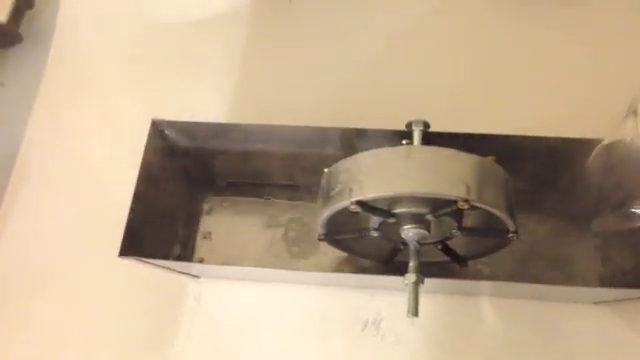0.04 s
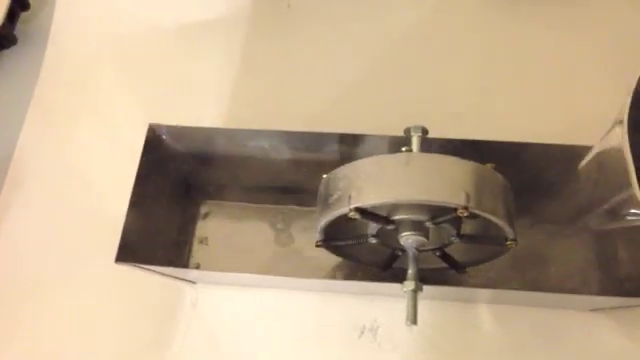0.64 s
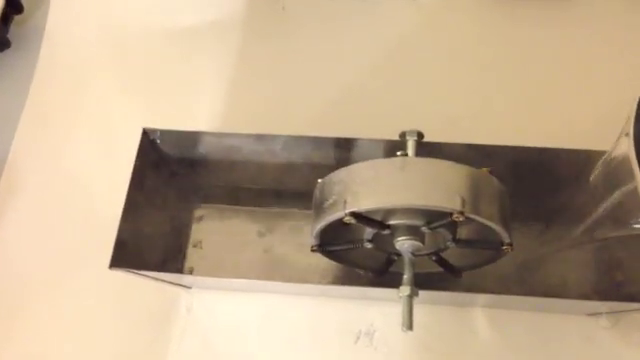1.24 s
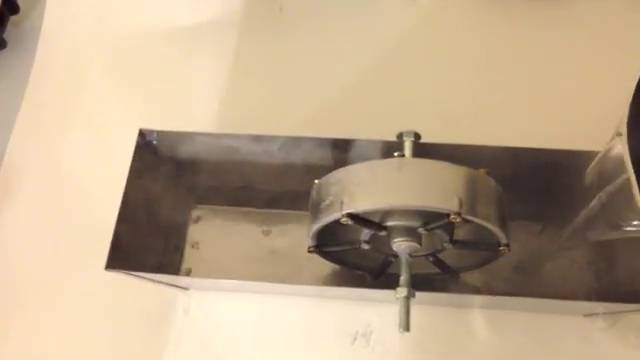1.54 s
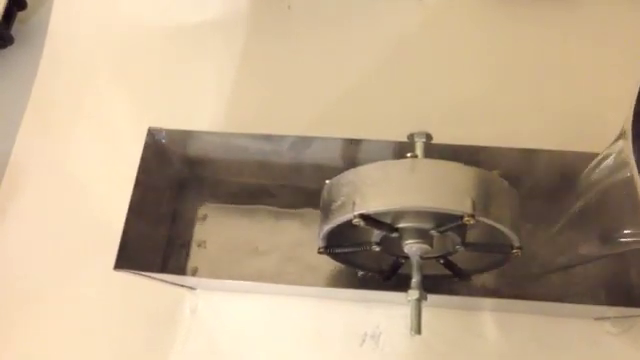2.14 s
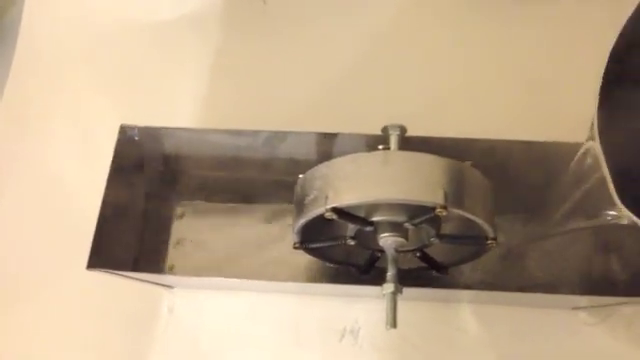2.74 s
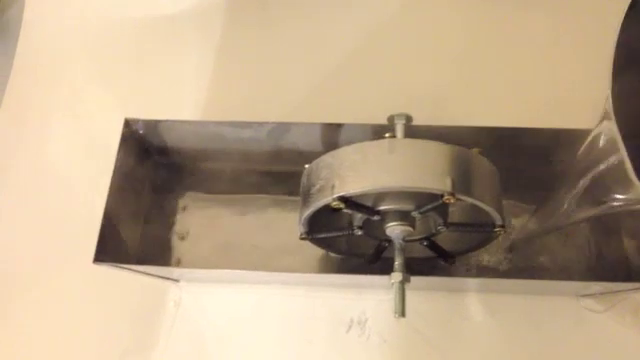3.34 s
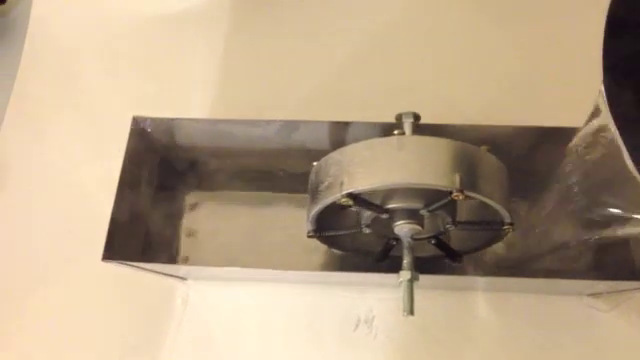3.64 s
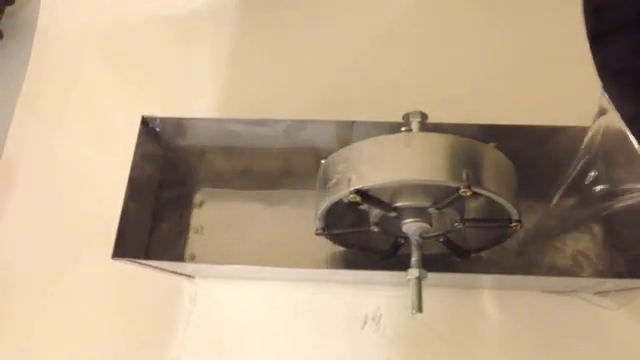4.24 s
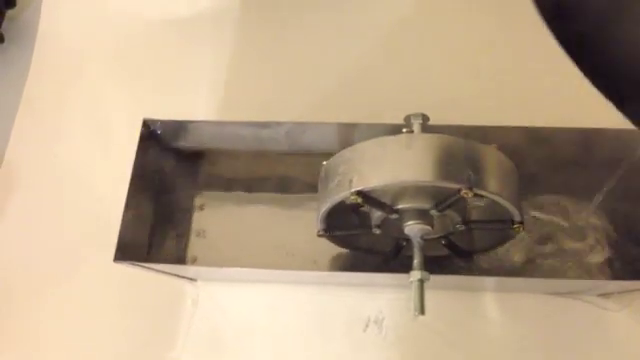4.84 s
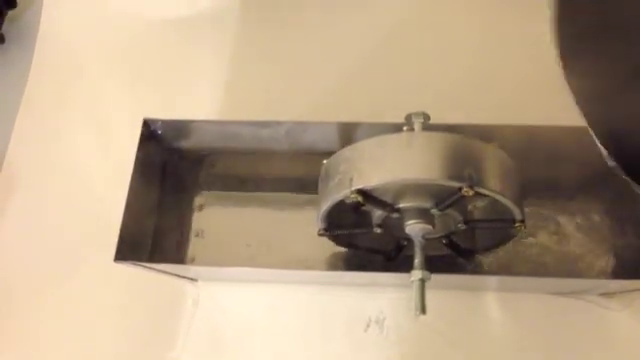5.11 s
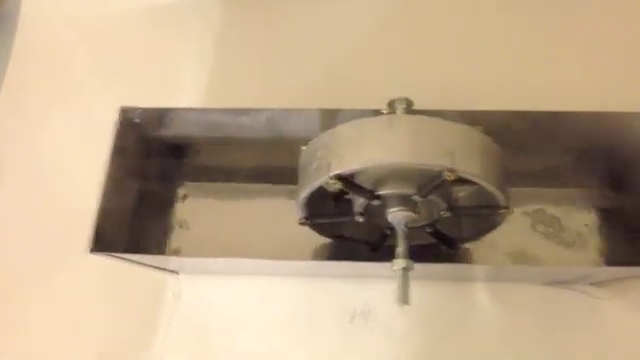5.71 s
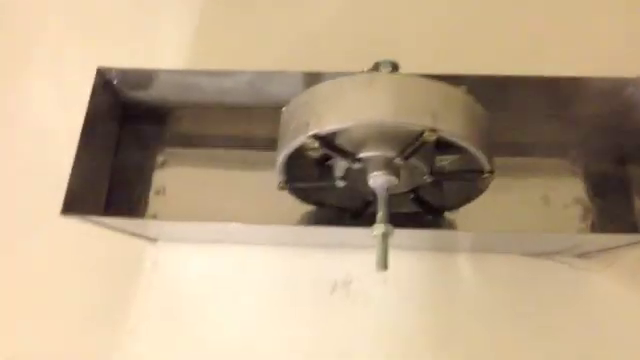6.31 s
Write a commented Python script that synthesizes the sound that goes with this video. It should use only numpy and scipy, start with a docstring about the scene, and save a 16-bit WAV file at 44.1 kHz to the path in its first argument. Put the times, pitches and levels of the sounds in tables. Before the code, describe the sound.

Water pours from a cup into a narrow steel basin, splashing and fizzing, thins to pinging drips, then one hard metallic knock.

```python
"""Water pours from a cup onto a small wheel and splashes into a narrow steel basin, close by.
The stream patters, fizzes and spits, trapped bubbles ring, and heavy gulps slap the thin floor.
As the pour thins out, the last drips make the steel ping. Then one hard knock rings the basin
and ducks the gain. The room hums faintly underneath."""
import sys
import numpy as np
from scipy import signal
from scipy.fft import rfft, irfft, next_fast_len
from scipy.io import wavfile
from scipy.ndimage import uniform_filter1d, minimum_filter1d, map_coordinates

SR = 44100
rng = np.random.default_rng(int(sys.argv[2]) if len(sys.argv) > 2 else 0)


def to_wav(sig):
    """Store sig (one row per channel, or 1-D mono) as 16-bit WAV at the path in sys.argv[1].

    Samples outside -1..1 are clipped; the rate is SR.
    """
    pcm = np.clip(np.atleast_2d(sig), -1, 1) * 32767
    pcm = np.round(pcm).astype(np.int16)
    wavfile.write(sys.argv[1], SR, pcm.T)  # frames by channels


N = 285327
TIME = np.arange(N) / SR
AGE = TIME[:SR // 3]  # seconds into a one-shot
THIN_S, DRAINED_S, STOP_S = 4.1, 4.9, 5  # the stream starts to thin, has run off the floor, stops

# bright resonances of the basin's floor: f/Hz, width/Hz, level/dB
FLOOR_MODES = [(778.5, 41, 3.5), (855, 49, -4.5), (1450, 48, -10.5)]


def amp(db):
    """Decibels to gain."""
    return 10 ** (np.asarray(db) / 20)


def unit(x):
    """Scale to rms 1."""
    return x / np.sqrt(np.mean(x ** 2) + 1e-20)


def fade(t60, t=AGE):
    """An exponential decay, 60 dB down after t60 seconds."""
    return np.exp(-np.log(1000) * t / t60)


def add(track, s, sound):
    """Mix a sound into a track at time s."""
    part = track[max(round(s * SR), 0):][:len(sound)]
    part += sound[:len(part)]


def filtered(x, response):
    """Pass x through a frequency response."""
    size = next_fast_len(len(x) + 8192)
    return irfft(rfft(x, size) * response(np.fft.rfftfreq(size, 1 / SR)), size)[:len(x)]


def shape(points):
    """An EQ curve through (f/Hz, level/dB) points on a log axis."""
    f, db = np.transpose(points)
    return lambda hz: amp(np.interp(np.log(hz + 1), np.log(f), db))


def resonances(modes):
    """A bank of (f/Hz, width/Hz, level/dB) resonators of alternating polarity."""
    return lambda f: sum((-1) ** k * amp(db) * 1j * f * width / (hz * hz - f * f + 1j * f * width)
                         for k, (hz, width, db) in enumerate(modes))


def hump(centre_hz, octaves):
    """A bell-shaped band around a centre."""
    return lambda hz: np.exp(-.5 * (np.log2((hz + 1) / centre_hz) / octaves) ** 2)


def noise(response, size=len(AGE)):
    """Coloured noise of rms 1."""
    return unit(filtered(rng.standard_normal(size), response))


def ring(hz, t60):
    """One decaying mode."""
    return np.sin(2 * np.pi * hz * AGE) * fade(t60)


def struck(modes):
    """(f/Hz, level/dB, t60/s) modes set ringing together in alternating polarity."""
    return sum((-1) ** k * amp(db) * ring(hz, t60) for k, (hz, db, t60) in enumerate(modes))


def wobble(rate):
    """A smooth random curve, rate knots a second."""
    return map_coordinates(rng.standard_normal(int(N * rate / SR) + 4), [TIME * rate])


def patter(rate, spread_db, t60, wash):
    """Random impacts of uneven size, each a tiny burst, over a wash of countless smaller ones."""
    hits = (rng.random(N) < rate / SR) * amp(spread_db * np.minimum(rng.standard_normal(N), 2))
    power = np.abs(signal.fftconvolve(hits ** 2, fade(t60) ** 2)[:N])
    return unit(np.sqrt(power / power.mean() + wash ** 2) * rng.standard_normal(N))


def flow_db(s=TIME, even_pour_db=-59.5):
    """Strength of the stream against an even pour."""
    # the pour as the cup tips: t/s, level/dB
    pour = [(0.0, -53.5), (0.42, -58.5), (1.48, -59.5), (2.32, -56.5), (2.83, -62.5), (3.4, -63.5),
            (3.68, -57.5), (3.91, -60.5), (4.25, -62), (4.4, -64), (4.75, -67.5), (4.89, -69), (5.0, -88)]
    return np.interp(s, *np.transpose(pour)) - even_pour_db


def fullness():
    """1 for a full stream, falling to 0 as it thins to a thread."""
    return np.interp(TIME, [THIN_S, STOP_S], [1, 0])


def cover_db(s=TIME, db_per_s=3.5):
    """Water mutes the floor's bright notes: it gathers under a full stream and runs off as it thins."""
    return -db_per_s * s * np.interp(s, [THIN_S, DRAINED_S], [1, 0])


def stream():
    """Lumps of water drum on the floor, splash on the walls, fizz and throw spray, riding the flow."""
    # the wet basin's low, wall and high resonances: f/Hz, width/Hz, level/dB
    low_modes = [(138.4, 19, 1), (232, 29, -22), (333, 58, -1), (431, 35, 0.5), (510, 83, -6),
                 (656, 82, -1)]
    wall_modes = [(1070, 84, -1.5), (1232, 70, 0), (1395, 45, 1), (1710, 126, -2.5), (1875, 69, -9.5)]
    high_modes = [(1875, 180, -3), (2410, 87, 2.5), (2934, 220, -4.5), (3513, 76, 7), (3885, 200, -2),
                  (4390, 140, 2.5)]
    # tone of the splashing drops and of the fine spray: f/Hz, level/dB
    splash_eq = [(250, -27), (500, -10), (1000, -4.5), (2000, 3), (4000, 1), (5500, 1.5), (9000, -34.5)]
    spray_eq = [(2000, -5), (4000, 1), (5200, -1), (6200, 0), (7500, 2), (9000, -0.5), (11000, -3.5),
                (15500, -6.5)]
    flow = flow_db()
    lumps = wobble(45)
    thumps = patter(rate=130, spread_db=5, t60=0.023, wash=0.49) * amp(1.7 * lumps)
    drops = patter(rate=150, spread_db=1, t60=0.016, wash=0.56) * amp(3.1 * lumps)
    mist = patter(rate=150, spread_db=5, t60=0.011, wash=0.64) * amp(2.0 * lumps)
    slosh = amp(-64.5 + 0.28 * flow) * unit(filtered(thumps, resonances(low_modes)))
    splash = amp(-64 + 0.7 * flow) * unit(filtered(drops, resonances(wall_modes)))
    sparkle = filtered(drops, resonances(high_modes)) + 0.43 * filtered(drops, shape(splash_eq))
    fizz = amp(-62.5 + 0.77 * flow) * unit(sparkle)
    spray = amp(-61.5 + 0.96 * flow) * unit(filtered(mist, shape(spray_eq)))
    drumming = amp(-59.5 + 0.65 * flow + cover_db()) * unit(filtered(thumps, resonances(FLOOR_MODES)))
    return (TIME < DRAINED_S) * (splash + fizz + drumming) + fullness() ** 2 * (slosh + spray)


def hollow_note():
    """The basin sings one hollow note under the pour, strongest when it is part filled."""
    # the hollow resonance: f/Hz, width/Hz, level/dB
    mode = [(351.4, 10, 0)]
    # its swells: t/s, level/dB
    swells = [(0.0, -74.5), (1.66, -61), (2.42, -65), (2.71, -59), (3.03, -72.5), (3.88, -68.5), (4.8, -83)]
    envelope = fullness() * amp(np.interp(TIME, *np.transpose(swells)))
    return envelope * noise(resonances(mode), size=N)


def room():
    """Room tone: steady hiss and a low hum."""
    # colour of the room tone: f/Hz, level/dB
    room_eq = [(15, -50.5), (25, -40), (91, -32.5), (122, -1.5), (147, -6.5), (173, -8.5), (209, -8),
               (239, -4.5), (266, -8.5), (358, -12.5), (521, -16.5), (967, -23.5), (1110, -25),
               (3910, -20.5), (15400, -23)]
    return amp(-65) * noise(shape(room_eq), size=N) + amp(-74.5) * noise(hump(127, octaves=.13), size=N)


def bubble(hz, rise, t60, t=AGE):
    """A trapped air bubble rings, bending up in pitch as it dies."""
    return np.sin(2 * np.pi * hz * t * (1 + rise * t / t60)) * fade(t60, t)


def bubbles(count, pitch_hz, spread, cycles, rise, from_s, base_db=-60, sizes_db=12):
    """Bubbles of scattered pitch and size ring in the splash; a stronger flow makes them louder."""
    out = np.zeros(N)
    for when, tone, size in rng.random((count, 3)):
        start = np.interp(when, [0, 1], [from_s, THIN_S])
        hz = pitch_hz * np.exp(spread * np.arctanh(1.98 * (tone - .5)))  # clustered round pitch_hz
        t60 = cycles / hz
        gain = amp(base_db + .4 * flow_db(start) + sizes_db * size)
        add(out, start, gain * bubble(hz, rise, t60, AGE[:round(t60 * SR)]))
    return out


def froths():
    """Sheets of water froth on the wall: clouds of like-sized bubbles swell and die in a narrow band."""
    # bubble clouds: middle t/s, level/dB, centre f/Hz, width/s
    clouds = [(.04, -56, 1440, .04), (.135, -53, 1440, .007), (.985, -53.5, 2400, 0.011),
              (1.13, -57.5, 2820, 0.0088), (2.059, -57.5, 2700, 0.04), (2.255, -54.5, 2790, 0.013),
              (2.35, -55, 1130, .028), (3.824, -53, 2230, 0.034), (3.977, -54.5, 5100, 0.0097),
              (4.061, -54, 4760, 0.0057), (4.28, -66, 9900, 0.018)]
    out = np.zeros(N)
    for s, db, hz, width in clouds:
        swell = np.exp(-.5 * ((AGE - AGE.mean()) / width) ** 2)
        cloud = amp(db) * swell * noise(hump(hz, octaves=0.23))
        start = s - AGE.mean()
        add(out, start, cloud[start + AGE >= 0])
    return out


def tick(hz, echo_db=-11):
    """A sharp droplet click with a short tail of echoes between the walls."""
    snap = ring(hz, 5 / hz) + .5 * ring(11300, 0.0018)
    echo = noise(hump(hz, octaves=0.34)) * (fade(0.01) + amp(-9) * fade(0.05))
    return snap + amp(echo_db) * echo


def droplets(count=44, spit_db=-39, scatter_db=3.5, spit_hz=6500, scatter_octaves=0.33):
    """Loud droplets click among lesser ones that spit at random while the stream is full."""
    # droplets that burst or hit hard: t/s, level/dB, f/Hz
    accents = [(0.3272, -33.5, 7710), (0.708, -31.5, 8400), (0.9343, -24, 6700), (1.3541, -27.5, 9400),
               (1.3853, -34, 8500), (1.6596, -33.5, 7650), (1.7427, -33.5, 4620), (1.807, -30, 6660),
               (1.8594, -32.5, 7200), (2.177, -26, 7000), (2.1929, -27.5, 11100), (2.4296, -26.5, 6100),
               (2.5518, -31, 7150), (2.6092, -33.5, 3660), (2.7472, -34, 3600), (2.827, -33.5, 5750),
               (3.043, -30, 6240), (3.0716, -35, 4100), (3.1625, -33.5, 5800), (3.4131, -32.5, 6360),
               (3.452, -31.5, 9100), (3.493, -37, 3370), (3.6456, -21, 5470), (3.714, -37, 3450),
               (4.0819, -22.5, 5370), (4.3646, -35.5, 3520), (4.8554, -37, 5640)]
    out = np.zeros(N)
    times = (np.arange(count) + rng.random(count)) * THIN_S / count
    for s, (size, tone) in zip(times, np.clip(rng.standard_normal((count, 2)), -2, 2)):
        add(out, s, amp(spit_db + scatter_db * size) * tick(spit_hz * 2 ** (scatter_octaves * tone)))
    for s, db, hz in accents:
        add(out, s + 0.0012, amp(db - 1) * tick(hz))
    return out


def slaps():
    """A gulp smacks the thin floor; bending waves carry the highs first, so the boom comes late."""
    # gulps landing: t/s, weight level/dB, smack level/dB
    gulps = [(0.178, -47.5, -62), (0.254, -51, -64), (0.544, -49, -56), (0.602, -48, -44),
             (0.686, -50, -42), (0.817, -49.5, -52), (0.884, -67, -46), (1.38, -49.5, -62),
             (1.411, -52, -47), (1.544, -49.5, -55), (1.687, -46.5, -62), (1.728, -40.5, -51),
             (1.9, -53.5, -66), (2.193, -54, -43), (2.39, -45.5, -42), (2.608, -46.5, -46),
             (2.745, -48, -43), (2.825, -49, -40.5), (3.414, -43, -47), (3.633, -55, -52),
             (3.739, -59, -41), (4.082, -44, -38), (4.105, -54.5, -36.5), (4.868, -56.5, -42.5)]
    out = np.zeros(N)
    for s, weight_db, smack_db in gulps:
        detune = np.exp(0.018 * rng.standard_normal(2))
        splat = noise(hump(1030, octaves=1)) * (fade(0.015) + amp(-9.5) * fade(0.17))
        smack = ring(1600 * detune[0], 0.0015) + 0.32 * splat
        glide_hz = 380 + 620 * fade(0.049) + 900 * fade(0.0049)
        bend = np.sin(2 * np.pi * np.cumsum(glide_hz) / SR) * fade(0.037)
        bright = bend + 1.13 * ring(778 * detune[0], 0.066)
        boom = ring(352 * detune[1], 0.12) + 0.5 * noise(hump(453, octaves=0.71)) * fade(0.16)
        add(out, s + .001, amp(smack_db + 7) * smack)
        add(out, s + 0.00115, amp(weight_db + 5 + cover_db(s)) * bright)
        add(out, s + 0.00399, amp(weight_db + 2.5) * boom * (1 - fade(0.025)))
    add(out, 4.086, amp(-49.5) * ring(134.5, 0.37))  # one heavy gulp shakes the whole basin
    return out


def foam(centre_hz=6150, db=-69, starts_s=0.96, built_s=2.7, gone_s=4.5):
    """Tiny bubbles burst in flurries; the foam builds as the basin fills and dies as the pour thins."""
    amount = np.interp(TIME, [starts_s, built_s, THIN_S, gone_s], [0, 1, 1, 0])
    pops = patter(rate=70, spread_db=4, t60=.014, wash=.3)
    return amp(db) * amount * unit(filtered(pops, hump(centre_hz, octaves=.14)))


def plinks():
    """Single drops each trap one bubble that plinks."""
    # plinking drops: t/s, level/dB, f/Hz
    drops = [(2.678, -39, 1260), (2.747, -41, 1850), (3.162, -40.5, 6100), (3.304, -37, 1430),
             (4.856, -43.5, 5600), (4.87, -39.5, 1260)]
    out = np.zeros(N)
    for s, db, hz in drops:
        add(out, s, amp(db) * bubble(hz, rise=0.032, t60=0.024))
    return out


def drips(t60=0.089):
    """Soft drips ping the steel floor, each with a faint splat; a brief swish comes between them."""
    # the last drips: t/s, ping level/dB, splat level/dB
    last_drips = [(4.262, -50, -54), (4.459, -45.5, -61), (4.664, -54, -56), (4.807, -45.5, -61),
                  (4.838, -55, -56.5), (5.206, -49, -62.5), (5.259, -54.5, -73), (5.386, -49.5, -66),
                  (5.436, -42, -58), (5.47, -49, -61), (5.489, -37.5, -58.5), (5.529, -51.5, -70),
                  (5.579, -55.5, -62), (5.609, -55.5, -59), (5.725, -44.5, -56), (5.919, -62, -66)]
    # the floor's modes under a drip: f/Hz, level/dB
    ping_modes = [(767, 1), (671, -10.5), (1455, -12), (2030, -24), (4570, -24)]
    out = np.zeros(N)
    for s, ping_db, splat_db in last_drips:
        ping = sum(amp(db + rng.standard_normal()) * ring(hz * (1 + rng.normal(0, 0.007)), t60)
                   for hz, db in ping_modes)
        splat = noise(hump(2200, octaves=1)) * fade(0.062)
        add(out, s, (amp(ping_db + 0.5) * ping + amp(splat_db) * splat) * (1 - fade(0.025)))
    swish = noise(hump(5000, octaves=1.8)) * fade(.16) * (1 - fade(0.036))
    add(out, 5.283, amp(-54.5) * swish)
    ring_on = noise(resonances(FLOOR_MODES)) * fade(0.47) * (1 - fade(.2))
    add(out, 5.47, amp(-54.5) * ring_on)  # a quick run of drips keeps the floor ringing
    return out


def knock(blow_s=6.2702):
    """A light graze, then a hard blow: a crack and a clack, the basin's modes and their dense clang."""
    # modes of the basin, and the short clack of what strikes it: f/Hz, level/dB, t60/s
    basin_modes = [(278, -39, .21), (355, -41, .17), (624, -29, .18), (741, -23, .16), (772, -36, .19),
                   (1027, -44, .2), (1157, -19, .13), (1200, -32, .1), (1403, -42, .17), (1704, -40, .14),
                   (1830, -22, .08), (1896, -29, .08), (2256, -16, .09), (2646, -20, .07), (2695, -24, .1),
                   (2820, -30, .07), (3305, -34, .14), (3631, -22, .08), (3918, -26, .11), (4493, -30, .07),
                   (4642, -30, .135), (5168, -28, .07), (5642, -35, .08), (5967, -36, .15),
                   (7237, -53, .18), (8608, -54, .18), (10335, -47, .08)]
    clack_modes = [(1704, -10, 0.029), (1858, -11, 0.044), (2600, -14, .02), (3300, -32, .018),
                   (3630, -25.5, 0.033), (4310, -26.5, .02), (6940, -32.5, 0.014), (9560, -35.5, 0.019)]
    # tone of the contact crack: f/Hz, level/dB
    crack_eq = [(300, -28), (1000, -4), (2400, 6.5), (4000, -5), (6000, -2), (6600, -31), (7400, -7),
                (10000, -23), (15500, -38)]
    out = np.zeros(N)
    touch = noise(hump(2200, octaves=.9)) * fade(0.067)
    graze = noise(hump(1600, octaves=0.58)) * fade(.1) * (1 - fade(0.076))
    crack = amp(-16) * noise(shape(crack_eq)) * fade(0.03)
    blow = struck(basin_modes) - struck(clack_modes) + crack + amp(-28.5) * clang()
    add(out, 6.247, amp(-50) * touch)
    add(out, 6.259, amp(-29.5) * graze)
    add(out, blow_s, amp(6.5) * blow)
    return out


def clang():
    """The basin's crowd of weak modes blooms as the blow spreads; the low ones linger."""
    # tone of the crowded modes: f/Hz, level/dB
    clang_eq = [(100, -27), (260, -5), (480, -14), (700, 4), (1200, -0.5), (1800, 4.5), (2600, 0),
                (3100, -11), (3800, -7), (6200, -18), (6600, -36.5), (7200, -28.5), (10000, -28),
                (15500, -42)]
    crowd = noise(shape(clang_eq)) * fade(0.2)
    low_tail = amp(-21) * noise(hump(750, octaves=0.43)) * fade(0.36)
    shimmer = amp(-22) * noise(hump(9000, octaves=.35)) * fade(0.18)
    return (crowd + low_tail + shimmer) * (1 - fade(0.01))


def scene():
    """Water, knock and room tone, mixed to mono."""
    sizzle = bubbles(count=90, pitch_hz=6170, spread=0.183, cycles=70, rise=0.036, from_s=1.5)
    gurgle = bubbles(count=110, pitch_hz=2004, spread=0.422, cycles=51, rise=.03, from_s=0)
    pour = stream() + hollow_note() + foam() + froths() + sizzle + gurgle
    impacts = plinks() + droplets() + slaps() + drips()
    return (pour + impacts + knock() + room())[None]


def record(dry, ceiling_db=-4, release_db_per_s=9, low_cut_hz=105, top_hz=15500):
    """The microphone drops the deep bass and the very top; gain ducks on a peak and recovers slowly."""
    heard = signal.sosfilt(signal.butter(4, low_cut_hz, "high", fs=SR, output="sos"), dry[0])
    over_db = np.maximum(20 * np.log10(np.abs(heard) + 1e-9) - ceiling_db, 0)
    recovery_db = release_db_per_s * TIME
    duck_db = np.maximum.accumulate(over_db + recovery_db) - recovery_db
    gain = uniform_filter1d(minimum_filter1d(amp(-duck_db), size=64), size=64)  # smooth look-ahead
    self_noise = amp(-87.5) * noise(hump(80, octaves=1.2), size=N)
    return filtered(heard * gain + self_noise, lambda hz: hz < top_hz)[None]


dry = scene()
out = record(dry)
to_wav(out)
```